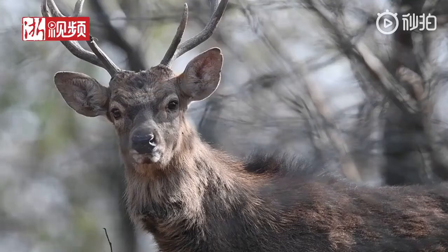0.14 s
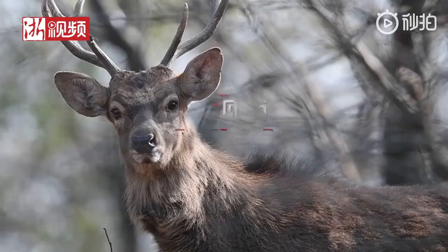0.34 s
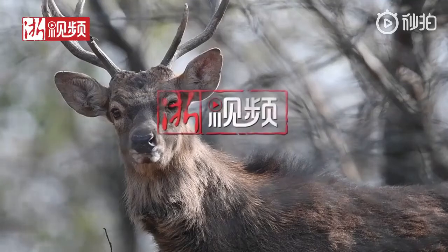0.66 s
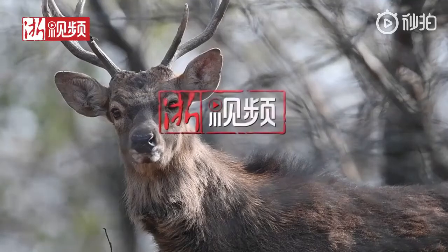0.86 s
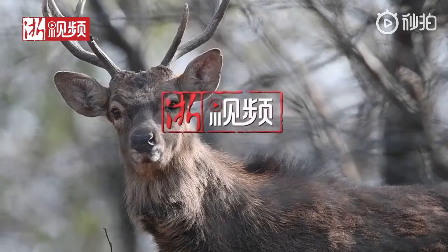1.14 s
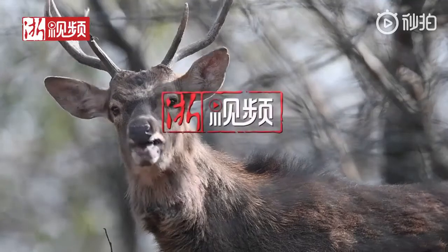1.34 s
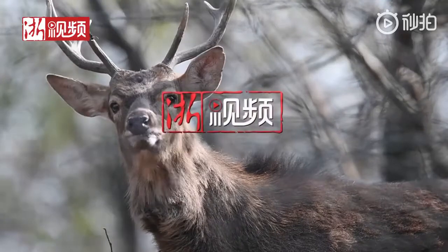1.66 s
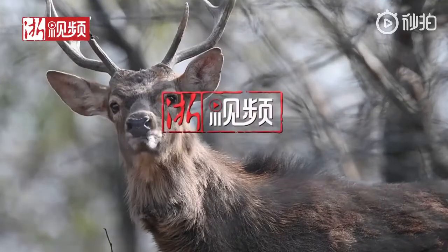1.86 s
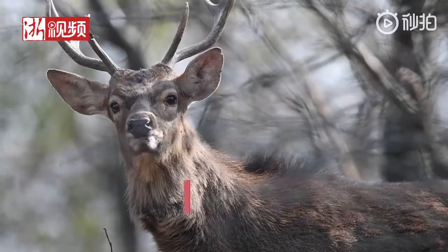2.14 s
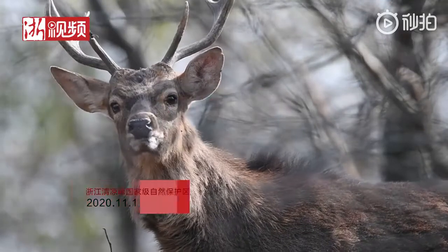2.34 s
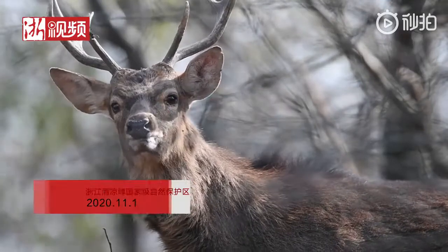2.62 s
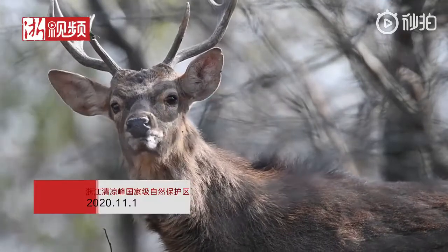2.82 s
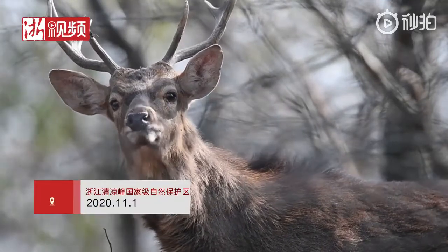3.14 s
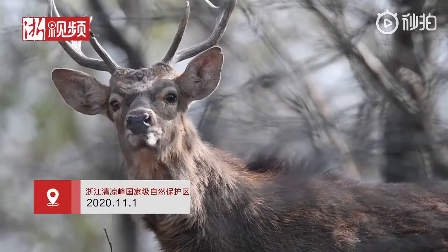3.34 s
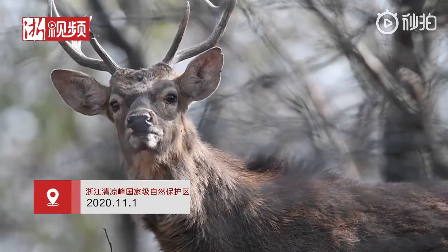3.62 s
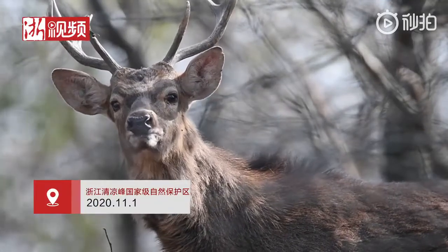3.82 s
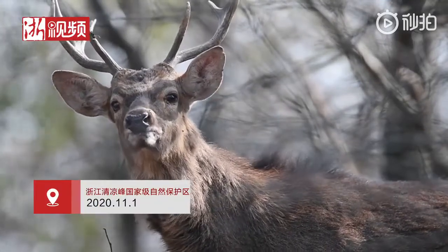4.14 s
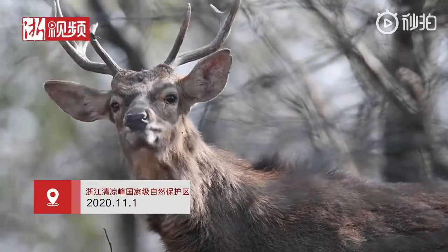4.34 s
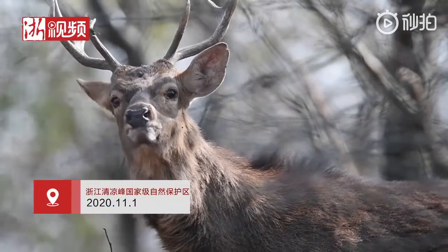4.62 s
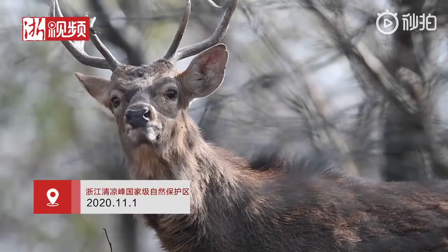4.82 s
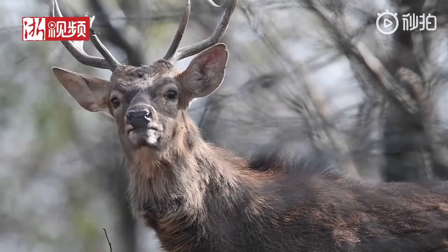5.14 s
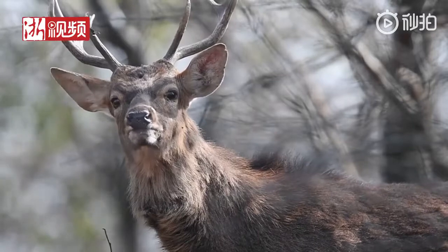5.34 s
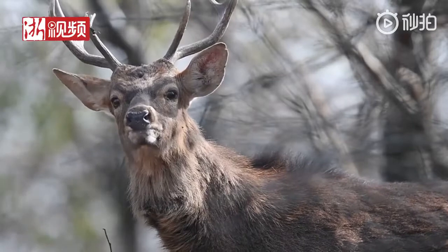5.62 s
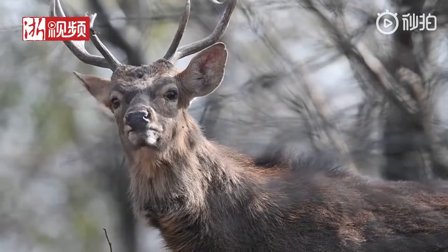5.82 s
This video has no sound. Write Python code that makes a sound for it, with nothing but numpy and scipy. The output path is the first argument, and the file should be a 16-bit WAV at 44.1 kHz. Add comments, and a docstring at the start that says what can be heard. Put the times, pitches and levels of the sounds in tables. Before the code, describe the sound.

In a quiet wood, faint leaf hiss and low wind bumps come first. A stag then gives three loud, high, nearly pure whistles about a second and a half apart, each arching upward and falling sharply. A tiny airy squeak follows the first. Trunks return brief, scattered echoes. The stereo microphone hears the calls nearly centred, slightly left, with soft wind thuds between them.

```python
"""A wood: a stag gives three high arching whistles, with one faint rising squeak after the first.
Whistles are gliding partials plus breath, lifted by throat resonances below 2.4 kHz and two fixed high bands
that brighten what crosses them; the squeak is a main glide, a higher overtone and two smeared echoes.
Random sparse taps throw the calls back off the trees; a thin very high tone joins the first whistle.
Leaves are patchy stereo hiss under gusts; wind on the microphone is damped low thuds and rumble."""
import sys
import numpy as np
from scipy import signal
from scipy.fft import rfft, irfft
from scipy.io import wavfile
from scipy.ndimage import uniform_filter1d, minimum_filter1d

SR = 44100
rng = np.random.default_rng(int(sys.argv[2]) if len(sys.argv) > 2 else 0)


def digitize_waveform(pressure):
    """Quantize a signal to 16-bit integers and store it at the path in sys.argv[1].

    Rows of a 2-D input are taken as channels; values are limited to [-1, 1].
    """
    field = np.atleast_2d(pressure).T
    bounded = np.clip(field, -1, 1)
    quanta = np.round(bounded * 32767).astype(np.int16)
    wavfile.write(sys.argv[1], SR, quanta)


N = 263321

# leaf hiss colour, relative: f/Hz, density/dB per Hz
HISS_COLOUR = [(18, -42.5), (30, 3), (75, -3), (147, -21), (404, -2.5), (662, -2.5), (716, -2.5),
               (1830, -2.5), (4540, -5.5), (8690, -9.5), (11300, -6.5), (13900, -16), (14700, -19),
               (15000, -40.5)]
# leaf likeness between left and right: f/Hz, likeness/1
LEAF_LIKENESS = [(100, 1), (300, 1), (700, 0.79), (1500, 0.48), (4000, 0.067), (12000, 0.35)]
# gusts through the leaves: t/s, half length/s, low lift/dB, high lift/dB
LEAF_GUSTS = [(0.624, 0.095, 5.5, 0), (0.863, 0.11, 6.5, 6), (1.65, 0.43, 5.5, 4), (2.7, 0.23, 4, 2.5),
              (3.26, 0.19, 6.5, 3.5), (4.644, 0.21, 0, 0), (5.624, 0.086, 9, 4.5), (5.73, .07, 2, 5),
              (5.883, 0.19, 6, 4)]
CALM_LOW_DB, CALM_HIGH_DB = -70.5, -78.5  # between gusts, before the band offset in leaves()
LEAF_LAG_S = 10 / SR  # leaves reach the left port first

# air puffs on the microphone: t/s, peak/dB before the highpass, f/Hz
WIND_PUFFS = [(0.194, -50, 188), (0.288, -46, 127), (0.472, -40.5, 163), (0.609, -48, 100),
              (0.728, -48, 182), (0.819, -46, 106), (0.883, -49, 160), (1.195, -51, 120),
              (1.446, -49.5, 133), (1.709, -47.5, 197), (1.971, -36.5, 215), (2.031, -52, 97.6),
              (2.108, -57.5, 117.9), (2.306, -47.5, 142), (2.529, -50, 180), (2.6, -51, 148),
              (2.732, -45, 186), (2.845, -47, 109), (2.916, -43.5, 185), (2.953, -42.5, 167),
              (3.002, -44.5, 180), (3.289, -49, 127), (3.319, -41, 158), (3.349, -45, 194),
              (3.591, -50, 100), (3.663, -43.5, 152.6), (3.768, -44, 150.4), (4.346, -47.5, 124),
              (4.904, -48, 145), (5.042, -44.5, 170), (5.075, -44, 193), (5.093, -40.5, 217),
              (5.154, -59, 132), (5.25, -48, 96), (5.56, -52.5, 100), (5.634, -48.5, 398),
              (5.715, -47.5, 244), (5.795, -41, 235), (5.81, -54, 144)]
# spells of wind over the small puffs and rumble: t/s, half length/s, lift/dB
WIND_SPELLS = [(.55, 0.31, 12.5), (1.303, .2, 0.5), (2.05, 0.14, 7.5), (2.55, .15, 8.5), (2.9, 0.14, 17),
               (3.36, 0.17, 13), (3.75, 0.15, 9), (5.139, 0.12, 18.5), (5.794, 0.085, 19.5)]
FLUTTER_DB = -72.5  # small puffs in still air, before the highpass

# one curve a whistle: t/s, f/Hz, effort/dB before band lift
WHISTLE_CURVES = [
    [(1.443, 3580, -61.5), (1.462, 3278, -31.5), (1.487, 3696, -13), (1.535, 3809, -10.5),
     (1.6, 3923, -13.5), (1.642, 3934, -22), (1.66, 3889, -9), (1.715, 3574, -12), (1.76, 3207, -26),
     (1.782, 2910, -37.5), (1.815, 2280, -60.5), (1.842, 1805, -56.5), (1.853, 1047, -68),
     (1.865, 940, -66)],
    [(3.099, 3240, -53.5), (3.106, 3230, -31.5), (3.136, 3495, -15), (3.155, 3615, -13.5),
     (3.196, 3604, -15), (3.215, 3310, -19.5), (3.24, 2900, -31.5), (3.256, 2330, -49),
     (3.285, 1900, -71.5), (3.315, 990, -55.5), (3.33, 960, -77)],
    [(4.487, 3100, -61), (4.5, 3145, -31.5), (4.525, 3264, -14.5), (4.556, 3349, -11.5), (4.578, 3482, -10),
     (4.622, 3520, -12.5), (4.645, 3355, -15.5), (4.672, 2900, -21), (4.69, 2420, -56),
     (4.724, 2080, -52.5), (4.742, 1024, -63.5), (4.75, 950, -74)],
]
# direct sound, one value a whistle: left minus right/dB
WHISTLE_PAN_DB = [1.5, 3, 1.5]
# throat resonances below 2.4 kHz, then two fixed high bands that brighten: f/Hz, width/Hz, lift/dB
LIFT_BANDS = [(1030, 67, 16.5), (1280, 170, 7), (1850, 120, 10.5), (2316, 160, 12.5), (9730, 900, 31.5),
              (13100, 690, 24.5)]
# second partial re effort: whistle f/Hz, level/dB
SECOND_PARTIAL = [(2700, -41.5), (3050, -25), (3300, -16), (3500, -12.5), (3700, -19.5), (3950, -9)]
# third and fourth partials re effort, before band lift: level/dB
UPPER_PARTIALS_DB = [-57, -59]
# breath colour before band lift, relative: f/Hz, density/dB per Hz
BREATH_COLOUR = [(500, -21.5), (900, -21.5), (2500, -6), (4500, -5), (6200, -9.5), (8000, -15),
                 (11000, -23), (15000, -27.5)]
BREATH_DB, BREATH_PER_EFFORT = -45, 0.41  # level at 0 dB effort; dB per dB
# decay of the wood's early slope: f/Hz, t60/s
WOOD_DECAY = [(1000, 0.4), (2500, 0.16), (3700, 0.45), (6600, .3), (12000, 0.53)]

# thin tone on the left: t/s, length/s, f/Hz, starting level/dB
THIN_TONE = (1.555, .125, 12230, -37)
# hoarse bursts, as whistles drop and under the squeak: t/s, length/s, level/dB, centre/Hz, width/Hz
HOARSE_BURSTS = [(1.735, .045, -48, 1900, 1500), (1.72, .065, -49, 12000, 6000),
                 (3.192, .045, -51, 12000, 6000), (1.975, .16, -56, 3300, 3200)]
# one squeak: main glide, higher overtone, two smeared echoes: t/s, length/s, from/Hz, to/Hz, level/dB
SQUEAK_PARTS = [(1.964, .072, 1100, 3700, -55), (1.982, .022, 3700, 4900, -54), (2.0, .09, 2000, 2500, -63),
                (2.025, .09, 2600, 3150, -59)]

START_S, CEILING_DB, EDGE_HZ = .075, -2.0, 15100


def gain_of(db):
    """Amplitude ratio of a level in dB."""
    return 10 ** (np.asarray(db) / 20)


def evened(x):
    """Scale to unit RMS."""
    return x / np.sqrt(np.mean(x ** 2) + 1e-20)


def wander(count, size):
    """Unit-RMS smoothed noise; size in samples sets how slowly it moves."""
    return evened(uniform_filter1d(rng.standard_normal(count), size=size))


def read(points, hz):
    """Interpolate a table over log frequency."""
    f_hz, value = np.transpose(points)
    return np.interp(np.log(hz + 1), np.log(f_hz + 1), value)


def add(mix, s, sound):
    """Add a sound at a time in s, cut at the end of the mix."""
    part = mix[..., round(s * SR):][..., :sound.shape[-1]]
    part += sound[..., :part.shape[-1]]


def swells(t, s, half_s, lift_db):
    """Bell-shaped rises in level, added up in dB."""
    return (lift_db * np.exp(-((t[:, None] - s) / half_s) ** 2)).sum(1)


def leaves():
    """Patchy hiss whose low and high parts swell as gusts stir the leaves."""
    frames, hz = N // 256 + 5, np.fft.rfftfreq(1024, 1 / SR)
    a, b, c, d, patches = rng.standard_normal((frames, 513, 5)).T
    patches = evened(uniform_filter1d(uniform_filter1d(patches, 12, 0), 10, 1))
    flicker_db = .6 * wander(frames, 3)

    t = np.arange(frames) * 256 / SR
    s, half_s, low_lift_db, high_lift_db = np.transpose(LEAF_GUSTS)
    high = np.clip(np.log2(hz / 1000 + .01) / 2.0, 0, 1)[:, None]  # crossfade 1-4 kHz
    low_db = CALM_LOW_DB + swells(t, s, half_s, low_lift_db)
    high_db = CALM_HIGH_DB + swells(t, s, half_s, high_lift_db)
    swell_db = (1 - high) * low_db + high * high_db

    lag_turns = hz * LEAF_LAG_S * np.clip(hz / 1600., 0, 1)  # lag shrinks below 1600 Hz
    likeness = np.clip(read(LEAF_LIKENESS, hz), -1, 1)[:, None]
    right = a + 1j * b
    shared = likeness * right * np.exp(2j * np.pi * lag_turns)[:, None]
    left = shared + np.sqrt(1 - likeness ** 2) * (c + 1j * d)

    reference_db = (1 - high) * read(HISS_COLOUR, 900) + high * read(HISS_COLOUR, 8700)
    shape_db = read(HISS_COLOUR, hz)[:, None] - reference_db
    offset_db = -(8.0 - 1.9 * high)
    level_db = shape_db + swell_db + 0.78 * patches + flicker_db + offset_db
    z = np.array([left, right]) * gain_of(level_db)
    return signal.istft(z, nperseg=1024, noverlap=768)[1][:, :N]


def puff(hz, damping=7.4):
    """One soft pull and rebound of the membrane; damping per cycle."""
    cycles = np.arange(round(4 * SR / hz)) * hz / SR
    envelope = cycles ** 4.9 * np.exp(-damping * cycles)
    shape = -np.sin(2 * np.pi * (cycles - .25)) * envelope
    return shape / abs(shape).max()


def wind():
    """Distinct membrane thuds, with small random ones and a low rumble between."""
    thuds = np.zeros(N)
    for s, db, hz in WIND_PUFFS:
        add(thuds, s + .004, gain_of(db) * puff(hz))  # the push builds for a moment

    strikes = rng.random(N) < 70. / SR  # 70 per s on average
    size = gain_of(2.6 * np.minimum(rng.exponential(1, N), 3)) * strikes
    kind, pitches_hz = rng.integers(0, 6, N), np.geomspace(90, 260, 6)
    small = sum(signal.oaconvolve(size * (kind == k), puff(hz))[:N] for k, hz in enumerate(pitches_hz))

    band = signal.butter(2, [100, 270], "bandpass", fs=SR, output="sos")
    rumble = signal.sosfilt(band, rng.standard_normal(N))
    level_db = FLUTTER_DB + swells(np.arange(N) / SR, *np.transpose(WIND_SPELLS))
    out = thuds + gain_of(level_db) * (evened(small) + .45 * evened(rumble))
    return signal.sosfilt(signal.butter(2, 70, "highpass", fs=SR, output="sos"), out)


def band_lift_db(hz):
    """Each throat resonance or fixed high band lifts whatever passes near it."""
    return sum(db / (1 + (2 * (hz - f) / width) ** 4) for f, width, db in LIFT_BANDS)


def airy_noise(count, colour_db, lift=.3):
    """Unit-RMS turbulent air; the lift bands shape it by only a share (lift) of their dB."""
    hz = np.fft.rfftfreq(count, 1 / SR)
    spectrum = rfft(rng.standard_normal(count)) * gain_of(colour_db(hz) + lift * band_lift_db(hz))
    return evened(irfft(spectrum, count))


def whistle(rows):
    """Near-pure gliding tone, rough upper partials and breath; the bands lift all but partial two."""
    s, pitch_hz, effort_db = np.transpose(rows)
    t = np.arange(s[0], s[-1], 1 / SR)
    effort_db = uniform_filter1d(np.interp(t, s, effort_db), size=300, mode="nearest")
    hz = uniform_filter1d(np.interp(t, s, pitch_hz), size=500, mode="nearest")
    second_db = effort_db + read(SECOND_PARTIAL, hz)
    breath_db = BREATH_DB + BREATH_PER_EFFORT * effort_db

    hz = hz * (1 + 0.0026 * wander(len(t), 150))
    falter = np.clip((3100 - hz) / 500, 0, 1) * wander(len(t), 500)
    effort_db = effort_db + 4 * falter  # the voice breaks up at low pitch
    phase_rad = 2 * np.pi * np.cumsum(hz) / SR
    tone = gain_of(effort_db + band_lift_db(hz)) * np.sin(phase_rad)
    tone = tone + gain_of(second_db) * np.sin(2 * phase_rad)
    for k, db in enumerate(UPPER_PARTIALS_DB, start=3):
        rough = 1 + .7 * wander(len(t), 200)
        tone = tone + gain_of(effort_db + db + band_lift_db(k * hz)) * rough * np.sin(k * phase_rad)

    unevenness_db = 3 * wander(len(t), 1500)  # the air comes unevenly
    air = airy_noise(len(t), lambda f: read(BREATH_COLOUR, f), lift=0.34)
    breath = gain_of(breath_db) * gain_of(unevenness_db) * air
    return (np.sqrt(2) * tone + breath) * signal.windows.tukey(len(t), .03)


def near_trunks(x, count=7):
    """A few strong early echoes, different at each port, make the tone beat."""
    taps = np.zeros((2, round(.05 * SR)))
    at = rng.integers(40, taps.shape[1], (2, count))
    np.put_along_axis(taps, at, gain_of(-250. * at / SR), 1)  # -250 dB/s
    taps = taps / np.linalg.norm(taps, axis=1)[:, None]
    return signal.oaconvolve(x[None], taps, axes=1)[:, :N]


def wood(x, late_db=-24.0, late_slower=3.95):
    """Sparse echoes off trunks, each band dying at its own speed; the far slope answers for longer."""
    taps = np.zeros((2, 2 * SR))
    slots = np.arange(300, 2 * SR - 20, 20)
    at = slots + rng.integers(0, 20, (2, len(slots)))  # one tap per 20 samples
    np.put_along_axis(taps, at, rng.choice([-1., 1.], at.shape), 1)
    hz, t, z = signal.stft(taps, SR, nperseg=256)
    fall_db = -60 * t / read(WOOD_DECAY, hz)[:, None]
    decay = gain_of(fall_db) + gain_of(late_db + fall_db / late_slower)
    tail = signal.istft(z * decay, SR, nperseg=256)[1]
    tail = tail + 0.12 * tail[::-1]  # cross-bleed
    return signal.fftconvolve(x[None], tail / np.linalg.norm(tail[0]), axes=1)[:, :N]


def thin_tone():
    """A short very high sine of fixed pitch, left only, fading at 40 dB/s."""
    s, length_s, hz, db = THIN_TONE
    out, t = np.zeros((2, N)), np.arange(round(length_s * SR)) / SR
    tone = gain_of(db - 40.0 * t) * np.sin(2 * np.pi * hz * t)
    add(out[0], s, tone * signal.windows.tukey(len(t), .15))
    return out


def rasp(length_s, db, hz, width_hz):
    """A short hoarse burst: noise around a centre frequency, shaped by the lift bands."""
    count = round(length_s * SR)
    noise = airy_noise(count, lambda f: -12 * ((f - hz) / width_hz * 2) ** 2, lift=.9)
    return gain_of(db) * noise * np.hanning(count)


def squeak_part(length_s, from_hz, to_hz, db):
    """One part of the squeak: an unsteady, airy rise in pitch that swells and fades."""
    hz = np.linspace(from_hz, to_hz, round(length_s * SR))
    waver = wander(len(hz), 120)
    airy = 1 + .6 * wander(len(hz), 40)
    tone = np.sin(2 * np.pi * np.cumsum(hz * (1 + .02 * waver)) / SR)
    return gain_of(db) * airy * tone * signal.windows.tukey(len(hz), .6)


def scene():
    """Direct calls, their echoes, thin tone, leaves and wind, summed in stereo."""
    dry, direct = np.zeros(N), np.zeros((2, N))
    for rows, pan_db in zip(WHISTLE_CURVES, WHISTLE_PAN_DB):
        call = whistle(rows)
        add(dry, rows[0][0], call)
        add(direct, rows[0][0], call * gain_of([[pan_db / 2], [-pan_db / 2]]))
    faint = [(s, rasp(*rest)) for s, *rest in HOARSE_BURSTS]
    faint += [(s, squeak_part(*rest)) for s, *rest in SQUEAK_PARTS]
    for s, sound in faint:
        add(dry, s, sound)
        add(direct, s, sound)
    echoes = gain_of(-7.0) * near_trunks(dry) + gain_of(-12.0) * wood(dry)
    return direct + echoes + thin_tone() + leaves() + wind() * gain_of([[-.2], [.2]])


def record(dry):
    """Sound begins after a short silence; a limiter holds the loudest peaks; then the band limit."""
    opened = dry * np.clip((np.arange(N) / SR - START_S) / 0.018, 0, 1)  # 18 ms fade-in
    peak_gain = np.minimum(gain_of(CEILING_DB) / (abs(opened).max(0) + 1e-9), 1)
    limited = opened * uniform_filter1d(minimum_filter1d(peak_gain, size=400), size=200)
    lowpass = signal.firwin(511, EDGE_HZ, window=("kaiser", 9), fs=SR)
    return signal.oaconvolve(limited, lowpass[None], "same")


dry = scene()
out = record(dry)
digitize_waveform(out)
```